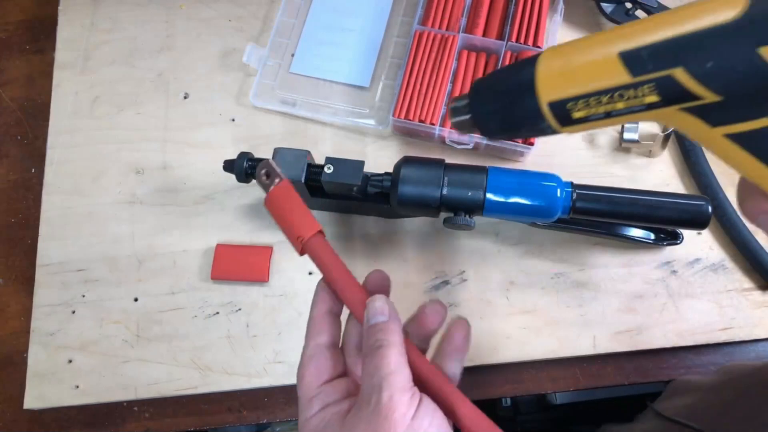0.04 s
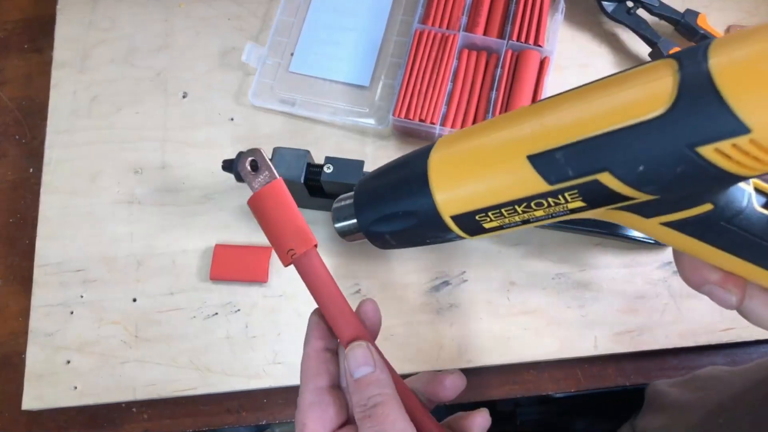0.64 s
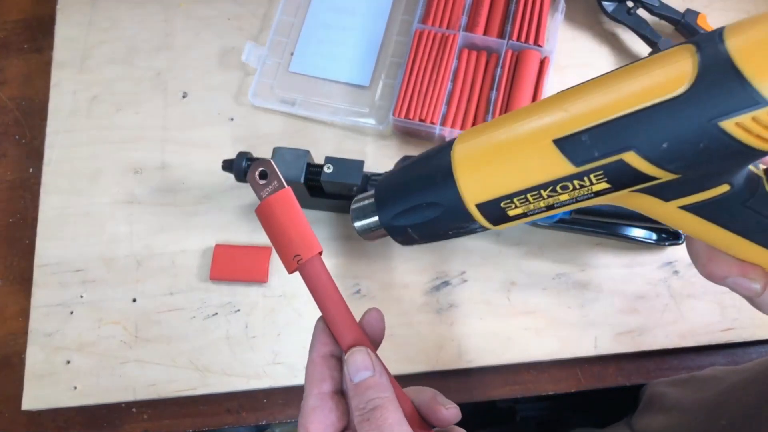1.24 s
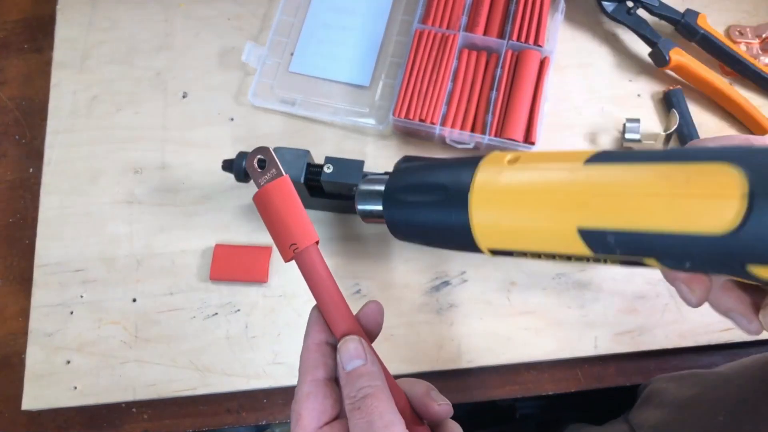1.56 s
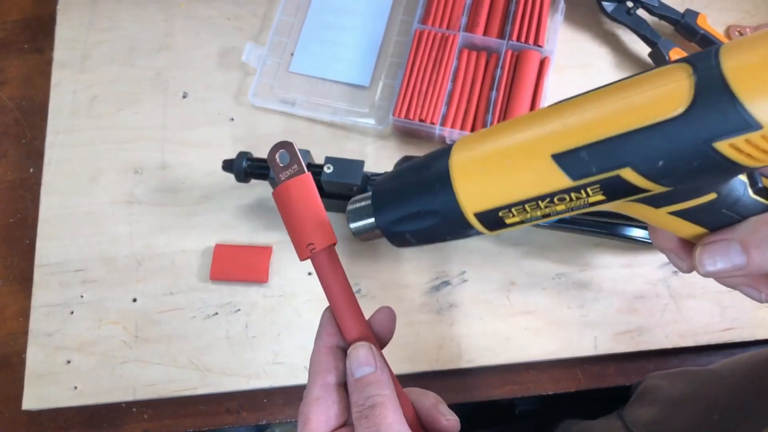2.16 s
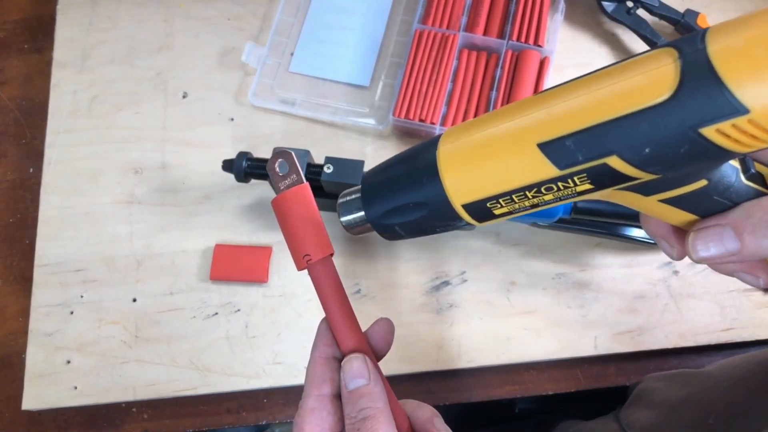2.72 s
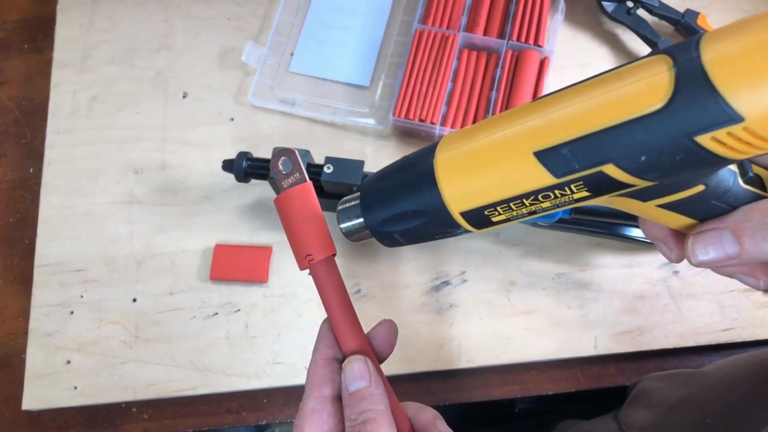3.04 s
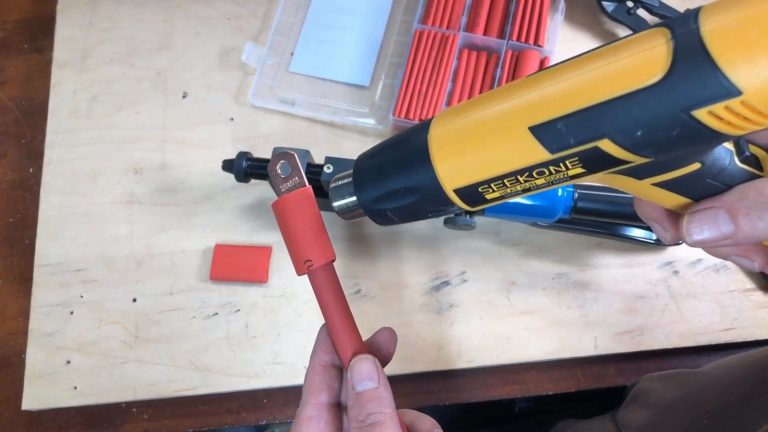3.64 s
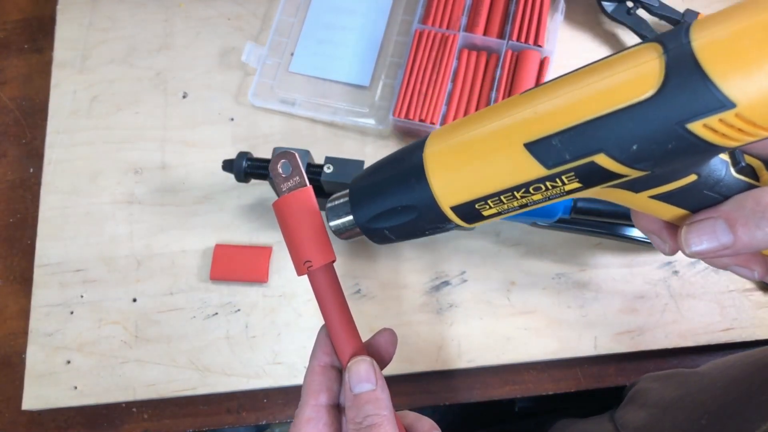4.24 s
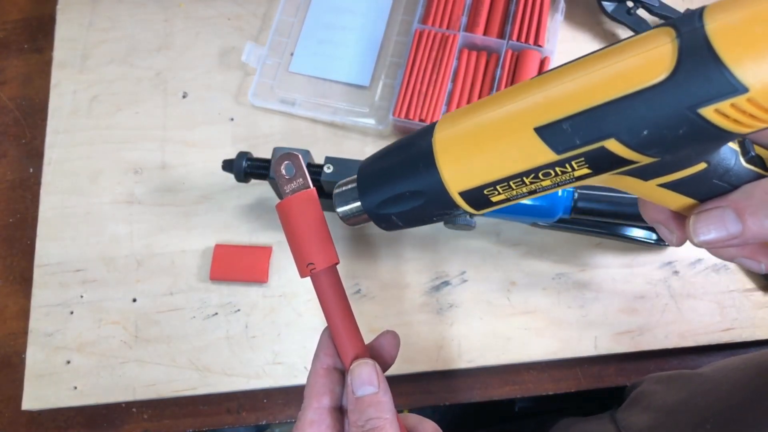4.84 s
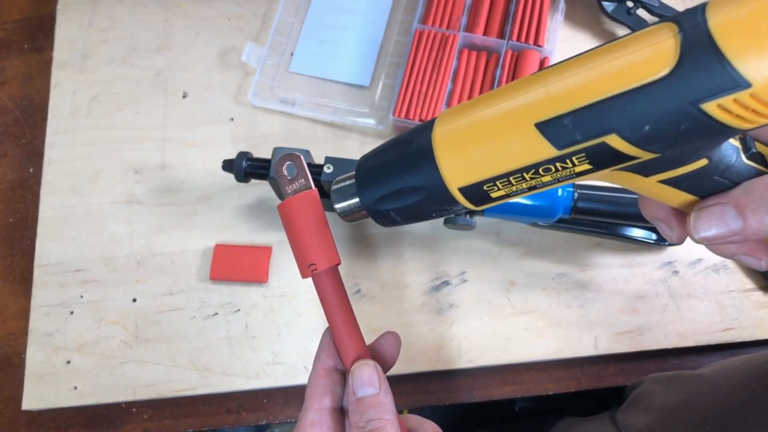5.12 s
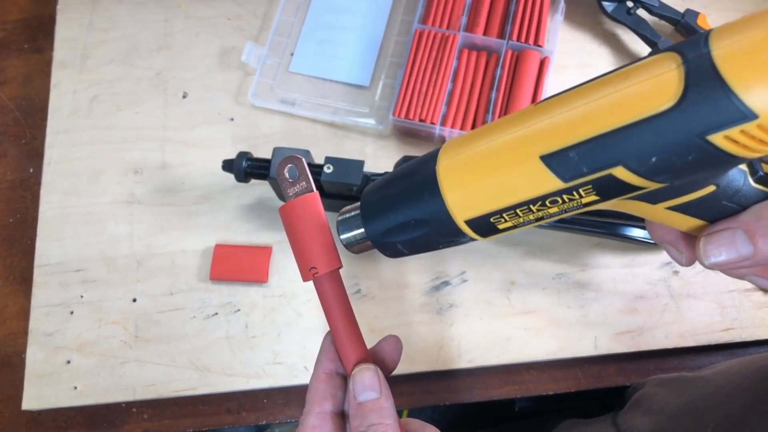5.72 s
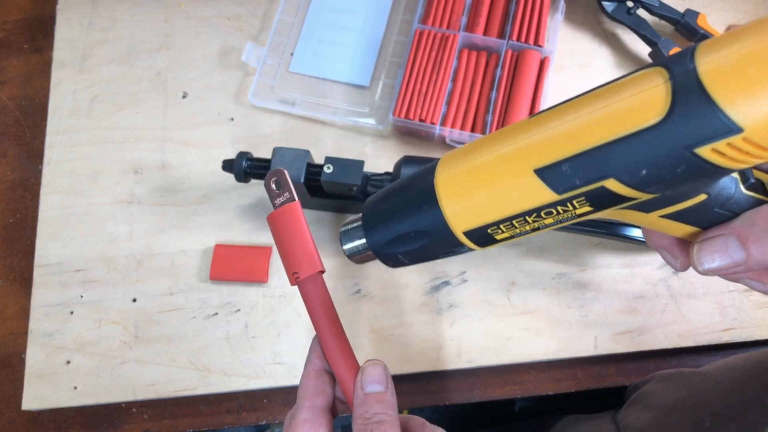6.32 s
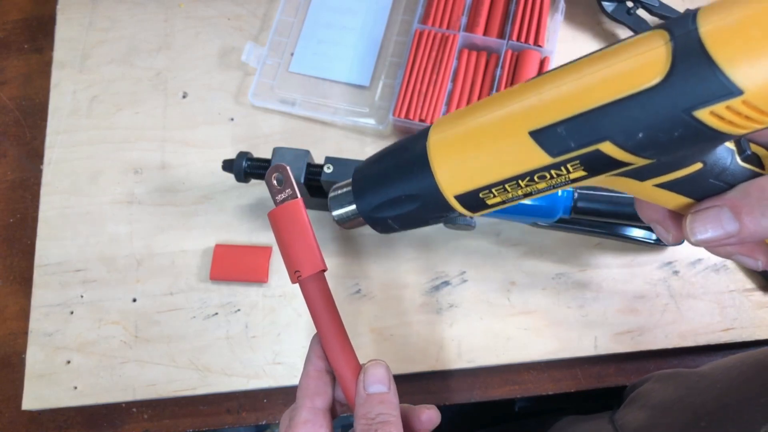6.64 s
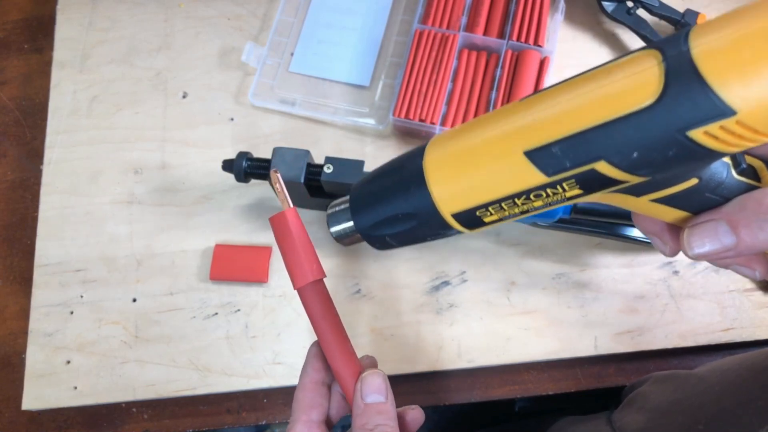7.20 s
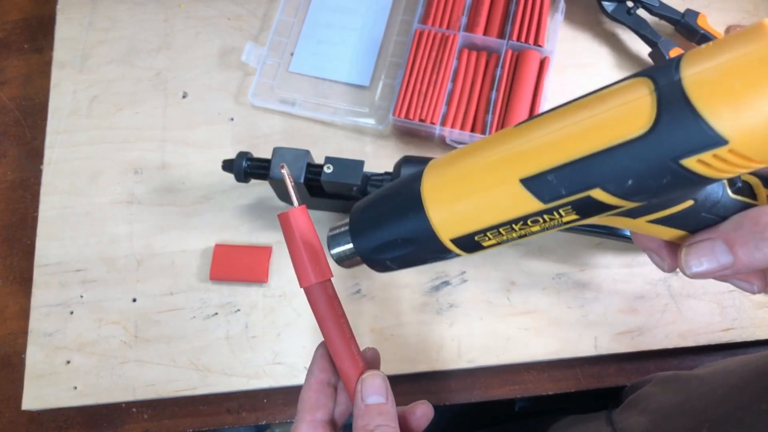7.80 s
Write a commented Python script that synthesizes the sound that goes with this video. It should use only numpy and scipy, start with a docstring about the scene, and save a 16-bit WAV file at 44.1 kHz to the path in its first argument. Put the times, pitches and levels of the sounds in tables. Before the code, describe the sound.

A heat gun's switch clicks twice, then its fan spins up to a steady high whistle over rushing air.

```python
"""A heat gun over a piece of shrink tubing, heard close up at a workbench through one microphone.
At first there is only mains hum, hiss and a thin, chopped electronic whine. A light tap, a rustle on the
grip, then the slide switch clicks twice just before 1 s. The five-bladed fan spins up to a 2 kHz whistle
with fainter shaft orders, over the rush of the air. The overtones swell as the hand rocks the gun
and, from 5.4 s, grow fainter as it is turned away from the microphone."""
import sys
import numpy as np
from scipy import signal
from scipy.fft import rfft, irfft
from scipy.io import wavfile
from scipy.ndimage import uniform_filter1d

SR = 44100
rng = np.random.default_rng(int(sys.argv[2]) if len(sys.argv) > 2 else 0)


def unload_wav(signal):
    """Save mono or channel-first audio to the path in sys.argv[1] as 16-bit WAV at rate SR, clipped to [-1, 1]."""
    wavfile.write(
        sys.argv[1],
        SR,
        np.round(np.clip(np.atleast_2d(signal).T, -1, 1) * 32767).astype(np.int16),
    )


N = 355622
TIME = np.arange(N) / SR
FREQ = np.maximum(np.arange(N // 2 + 1) * SR / N, 1)
MAINS_HZ, ZERO_CROSSING_S = 60, .787


# The blade whistle, close to the gun. Each row: time in seconds, base level in dB.
WHISTLE = [(1.3, -36.5), (1.37, -39.5), (1.41, -33), (1.43, -37), (1.56, -29.5), (1.73, -34.5),
           (3.52, -35.5), (3.88, -32.5), (4.36, -37.5), (4.74, -38.5), (5.04, -36), (6.36, -40.5),
           (6.77, -40), (6.92, -53), (7.62, -55), (8.05, -45.5)]
# Its second and third harmonics leave the gun in beams. Each gives: base level in dB with the nozzle
# down, loss in dB with it up, loss in dB once turned away, breadth of the beam as an exponent.
SECOND_BEAM = (-48, 40.5, 15, 1.5)
THIRD_BEAM = (-53, 17, 14.5, 4)

def fan(turns, spin_db, blades=5):
    """The passing blades whistle with two overtones, each tone on a skirt of turbulence."""
    running_db, = curves(WHISTLE)
    swirl_db, = curves(SWIRL)
    whistle_db = running_db + catch_db(spin_db) + .23 * wander(2.3)
    second_db = add_levels(swirl_db - 2, beam(*SECOND_BEAM)) + 3.5 * spin_db  # swirl feeds this one
    third_db = beam(*THIRD_BEAM) + 3.2 * spin_db
    up_to_speed = ramp(1.12, .12)
    passes = blades * turns
    whistle = tone(passes, whistle_db - .8 + .5 * wander(39))
    whistle += eddies(.984 * passes, 62, whistle_db - 8)  # these eddies lag behind the blades
    second = tone(2 * passes, second_db - 5 + 2.4 * wander(4.7)) * up_to_speed
    second += eddies(2 * passes, 110, second_db - 8.5)
    third = tone(3 * passes, third_db + 1.3 * wander(5.3)) * up_to_speed
    third += eddies(3 * passes, 190, third_db - 10)
    ripple = 2 * MAINS_HZ * TIME  # rectified mains ripples the torque and adds side tones
    side_tones = tone(passes + ripple, whistle_db - 27) + tone(3 * passes + ripple, third_db - 16)
    return (whistle + second + third + side_tones) * ramp(.96, .055)


def eddies(cycles, width_hz, db):
    """Blades cutting through eddies: a tone smeared into a narrow hump."""
    phase = 2 * np.pi * cycles
    return (wander(width_hz) * np.sin(phase) + wander(width_hz) * np.cos(phase)) * undb(db)


def catch_db(spin_db, threshold_db=-.38, db_per_db=4.6):
    """A whistle only catches near full speed: below a threshold of flow its level falls steeply."""
    return db_per_db * np.minimum(spin_db - threshold_db, 0)


def shaft_hz(start_s=.855, spin_up_s=.154, running_hz=401.8, creep_hz_per_s=.44):
    """Turns per second: the motor closes in on its running speed, then creeps up slowly."""
    age = np.maximum(TIME - start_s, 0)
    return (running_hz + creep_hz_per_s * age) * (1 - np.exp(-age / spin_up_s))


# The hand rocks the gun over the bench about once a second.
# Each row: time in seconds, tilt from about 0 (nozzle up) to about 1 (nozzle down).
ROCKING = [(1.3, .25), (1.62, 0.46), (1.78, 0.24), (1.95, 1.1), (2.48, 0.86), (2.98, .35), (3.22, 0.93),
           (3.65, .3), (3.92, 0.53), (4.15, 0.12), (4.27, 0.0091), (4.44, 0.78), (4.66, 0.7), (4.88, 0.33),
           (5.17, 0.34), (5.42, 0.88), (5.62, 0.96), (5.82, .12), (5.95, 0.2), (6.19, 0.98), (6.48, 0.15),
           (6.84, 0.88), (7.05, 0.16), (7.36, 1.0), (7.58, 0.27), (7.78, 0.97), (8.05, 0.92)]

def beam(db, tilt_loss_db, turn_loss_db, breadth, turn_s=5.41, turn_takes_s=1):
    """Level of a beamed sound at the microphone as the gun is rocked and turned away."""
    tilt, = curves(ROCKING)
    off_axis = np.maximum(1 - tilt, 0)
    return db - tilt_loss_db * off_axis ** breadth - turn_loss_db * ramp(turn_s, turn_takes_s)


# Strong swirl at the intake in the first seconds. Each row: time in seconds, base level in dB.
SWIRL = [(1.17, -65), (1.28, -46), (1.42, -47.5), (1.72, -41.5), (2.1, -46.5), (2.85, -48.5), (3.3, -51),
         (3.55, -55.5), (3.72, -70)]
# The draught drawn in at the back of the gun, with the same four values as SECOND_BEAM.
INTAKE_BEAM = (-55, 20.5, 8.5, 1.4)

def intake_db(spin_db):
    """Level of the air at the intake: the early swirl plus the beamed draught."""
    swirl_db, = curves(SWIRL)
    return add_levels(swirl_db, beam(*INTAKE_BEAM) + spin_db)


# The motor's steady tones. Each row: multiple of the shaft speed, level in dB at full speed.
MOTOR_ORDERS = [(2, -71.5), (4, -67), (6, -65), (7, -77.5), (9, -74.5), (11, -78), (13, -78), (14, -78.5),
                (27, -102), (33, -92.5), (34, -92.5), (35, -86.5), (36, -92.5), (37, -87)]
# Tones that swell with the intake air. Each row: multiple of the shaft speed, dB relative to that air.
INTAKE_ORDERS = [(4, -19), (6, -13), (7, -3), (9, -24), (11, -30), (13, -31), (14, -22)]
# The high whine beamed from the vents, with the same four values as SECOND_BEAM.
VENT_BEAM = (-55, 28, -0.5, 0.6)

def motor(turns, spin_db, vent_order=16):
    """Shaft orders from imbalance, uneven blades and the commutator; high ones sing near full speed."""
    imbalance = tone(turns, -70 + spin_db / 4 + 1.5 * wander(11)) * ramp(.96, .1)
    speed_db = 2 * spin_db
    steady = sum(tone(k * turns, db + speed_db + 2.3 * wander(8)) for k, db in MOTOR_ORDERS)
    air_db = intake_db(spin_db) + speed_db
    swelling = sum(tone(k * turns, db + air_db + 1.9 * wander(4.2)) for k, db in INTAKE_ORDERS)
    vent_db = beam(*VENT_BEAM) + speed_db
    whine = tone(vent_order * turns, vent_db + 1.4 * wander(45))
    whine += tone((vent_order + 1) * turns, vent_db - 18.5 + 2.2 * wander(8))
    return imbalance + steady + swelling + whine


def whirr(turns, at_s=1.31, width_s=.063, top_lag_s=.093):
    """As the motor pulls up to speed, middle and then top shaft orders rasp, in a brief bright hiss."""
    middle = sum(tone(k * turns, -62 + 3 * wander(20)) for k in (6, 7, 9, 10, 11))
    top = sum(tone(k * turns, -81 + 5 * wander(30)) for k in (25, 30, 33, 37, 40))
    hiss = noise(resonances([(4650, 2700, -94)])) * swell(1.6, .24) * ramp(1.1, .13)
    return middle * swell(at_s, width_s) + top * swell(at_s + top_lag_s, width_s / 2) + hiss


# Thin high tones at the microphone. Each row: time in seconds, base level in dB.
TREBLE_LEVEL = [(1.25, -88), (1.49, -74), (1.57, -56), (1.74, -63), (1.78, -77), (2.1, -89), (2.75, -80.5),
                (2.8, -69), (3.24, -84), (3.6, -79.5), (3.92, -67), (4.22, -83), (8.05, -79)]
# Their pitches. Each row: frequency as a multiple of the shaft speed, dB relative to that level.
TREBLE_TONES = [(24, -18.5), (25, -3), (26, -14.5), (30, -18), (34, -17.5), (37, -15.5), (39, -16.5)]

def treble_flare(turns, spin_db, peak_s=1.47, peak_db=-110.5, rise_db_per_s=49, fall_db_per_s=30):
    """Thin high tones and a pulsing sizzle, flaring briefly when the gun is loudest,
    perhaps overloading the microphone."""
    age = TIME - peak_s
    burst_db = peak_db + np.minimum(rise_db_per_s * age, -fall_db_per_s * age)
    trace_db = intake_db(spin_db) - 72.5  # the sizzle dies back to a trace that follows the intake air
    sizzle_db = add_levels(burst_db + 2.5 * wander(12), trace_db)
    tones_db = curves(TREBLE_LEVEL)[0] + catch_db(spin_db)
    tones = sum(tone(k * turns, db + tones_db + 2 * wander(14)) for k, db in TREBLE_TONES)
    colour = resonances([(8150, 1800, 1), (10000, 800, 0), (11900, 2000, .5), (15000, 2600, 1.5)])
    sizzle = noise(colour) * (1 + .7 * np.cos(2 * np.pi * turns))
    return tones + sizzle * undb(sizzle_db + spin_db + 1.8 * wander(60))


# The air jet leaving the nozzle. Each row: frequency in Hz, level in dB per Hz at full speed.
JET = [(100, -112), (280, -108), (900, -105), (1250, -87), (1700, -85.5), (2000, -84), (2300, -85),
       (2700, -93), (3200, -95), (3500, -90.5), (4400, -101), (5100, -102), (5700, -99.5), (6400, -104),
       (7100, -117), (15000, -120)]
# Resonances of barrel and bench. Each row: centre in Hz, width in Hz, dB per Hz relative to the rush.
BARREL_MODES = [(346, 108, -29), (493, 157, -28), (730, 122, -27.5), (862, 66, -26.5), (1069, 108, -24.5),
                (2970, 43, -27.5), (4880, 340, -37)]
# The hollow roar of the nozzle. Each row: time in seconds, base level in dB.
ROAR = [(1.28, -59), (1.41, -45.5), (1.5, -56), (1.58, -43.5), (1.9, -44.5), (2.08, -55.5), (2.19, -46.5),
        (2.65, -58.5), (3.05, -56.5), (8.05, -57)]
# Resonances of the nozzle. Each row: centre in Hz, width in Hz, dB per Hz relative to the roar.
NOZZLE_MODES = [(1329.4, 92, -21), (1460, 146, -22)]

def air_jet(spin_db, rush_db=-62.5):
    """The jet grows with fan speed, rings barrel and bench as it strikes the work, and roars."""
    roar_db, = curves(ROAR)
    jet = noise(slope(JET)) * undb(spin_db + 1.4 * wander(14))
    puffing_db = 1.2 * wander(11)
    rush = noise(resonances(BARREL_MODES)) * undb(rush_db + 1.8 * spin_db + puffing_db)
    roar = noise(resonances(NOZZLE_MODES)) * undb(roar_db - 1.5 + .5 * spin_db + 1.7 * wander(12))
    return jet + rush + roar


# Resonances of the fan housing. Each row: centre in Hz, width in Hz, dB per Hz relative to the intake.
HOUSING_MODES = [(2033, 148, -21.5), (2284, 73, -26), (2704, 450, -28.5), (2947, 220, -33),
                 (3450, 220, -36.5), (3840, 280, -35.5), (4200, 290, -35), (5680, 450, -38.5),
                 (6460, 450, -50.5)]

def housing(spin_db):
    """Air swirling in at the intake rings the fan housing."""
    level_db = intake_db(spin_db) + spin_db / 4 + 1.7 * wander(45)
    ring = noise(resonances(HOUSING_MODES)) * undb(level_db + 2 * wander(9))
    hollow = 1 - resonances([(5000, 550, -2)])  # a dip between the upper resonances
    return irfft(rfft(ring) * hollow, N)


# Puffs of air over the bench. Each row: peak time in seconds, width in seconds, level in dB per Hz.
PUFFS = [(1.566, 0.021, -74.5), (1.695, 0.0066, -83), (2.473, .03, -82), (2.952, 0.012, -81.5),
         (3.112, 0.014, -86)]

def puffs():
    """Short low puffs of air as the gun swings round."""
    envelope = sum(undb(db) * swell(s, width_s) for s, width_s, db in PUFFS)
    return noise(resonances([(428, 130, 0), (787, 130, .0051)])) * envelope


# A light tap, then the switch passes two detents and snaps home, the last two knocks heard as one.
# Each row: start in seconds, level in dB, time in seconds to ring down by 60 dB.
CLICKS = [(0.244, -59.5, 0.046), (0.834, -34, 0.05), (0.9454, -37.5, 0.072), (0.949, -28.5, 0.035)]
# Resonances of the gun's plastic shell. Each row: centre in Hz, width in Hz, relative level in dB.
SHELL_MODES = [(536, 250, -7), (800, 290, -7.5), (1035, 160, -2.5), (1300, 140, 0), (1780, 690, 2.5),
               (2150, 120, 5), (2580, 150, -1), (2890, 430, -2.5), (3400, 1400, -8.5), (4160, 620, -9),
               (4900, 440, -5.5), (6300, 1100, -18.5), (11000, 9200, -28)]

def clicks(contact_s=.00032, tail_db=-25, tail_t60=.2, low_hz=430):
    """Each knock rattles the plastic shell and leaves a faint tail in the room."""
    ring = noise(resonances(SHELL_MODES))
    envelope = 0
    for s, db, t60 in CLICKS:
        age = np.maximum(TIME - s, 0)
        contact = 1 - np.exp(-age / contact_s)
        decay = undb(-60 * age / t60) + undb(tail_db - 60 * age / tail_t60)
        envelope += contact * undb(db) * decay
    low_cut = signal.butter(4, low_hz, "high", fs=SR, output="sos")  # a small shell radiates no bass
    return signal.sosfilt(low_cut, ring / ring.std() * envelope)


def slider(chirp_s=.914, chirp_hz=1820, chirp_db=-67):
    """The hand rustles on the grip, the switch scrapes, and a faint chirp rises between its clicks."""
    rustle = noise(resonances([(2600, 1700, -114)])) * swell(.67, .08)
    scrape = noise(resonances([(2700, 5100, -106), (4500, 1500, -112)])) * swell(.812, .027)
    glide = np.clip((TIME - chirp_s) / .11, -.2, .2)
    hz = chirp_hz * (1 + glide + .02 * wander(200))
    chirp = tone(np.cumsum(hz) / SR, chirp_db) * swell(chirp_s, .009)
    return rustle + scrape + chirp


def electrics(whine_hz=7983, whine_db=-66.5, gap_share=.38, buzz_db=-115):
    """A thin whine drops out, and a faint buzz pulses, at every zero crossing of the mains."""
    half_cycles = 2 * MAINS_HZ * (TIME - ZERO_CROSSING_S)
    on = abs(half_cycles - np.round(half_cycles)) > gap_share / 2
    whine = tone(whine_hz * TIME, whine_db) * uniform_filter1d(on * 1., size=10)
    # smeared spikes of alternating sign carry the hum's odd harmonics into the treble
    spikes = np.diff(np.floor(half_cycles) % 2, prepend=0)
    smear = rng.standard_normal(N) * np.exp(-TIME / .0022)
    buzz = signal.fftconvolve(spikes, smear)[:N]
    colour = resonances([(2470, 1700, buzz_db), (8000, 2100, buzz_db - 5.5)])
    return whine + irfft(rfft(buzz / buzz.std()) * colour, N) * np.sqrt(SR / 2)


# Mains hum at the bench. Each row: frequency in Hz, level in dB.
HUM = [(60, -66), (180, -72), (300, -80), (420, -84), (540, -88.5), (660, -87), (780, -87), (900, -89),
       (1020, -93), (1140, -94), (1260, -90)]

def mains_hum():
    """Odd harmonics of the mains, lined up into a sharp step at each zero crossing."""
    phase_per_hz = 2 * np.pi * (TIME - ZERO_CROSSING_S)
    return sum(-np.sqrt(2) * undb(db) * np.sin(hz * phase_per_hz) for hz, db in HUM)


# The noise floor at the microphone. Each row: frequency in Hz, level in dB per Hz.
HISS = [(8, -77), (25, -102.5), (45, -95), (80, -95), (150, -103), (400, -113), (1200, -118), (2500, -117),
        (5000, -121), (10000, -122), (14000, -123), (15600, -115)]

def background_hiss():
    """A steady hiss, strongest in the bass, lies under everything."""
    return noise(slope(HISS))


def undb(db):
    """Decibels to gain."""
    return 10 ** (np.asarray(db) / 20)


def add_levels(a_db, b_db):
    """The level of two unrelated sounds together."""
    return 10 * np.log10(undb(a_db) ** 2 + undb(b_db) ** 2)


def curves(table):
    """The value columns of a table of (s, value, ..) rows, sample by sample."""
    s, *columns = np.transpose(table)
    return [np.interp(TIME, s, column) for column in columns]


def ramp(start_s, length_s):
    """A straight rise from 0 to 1."""
    return np.clip((TIME - start_s) / length_s, 0, 1)


def swell(peak_s, width_s):
    """A bell-shaped envelope."""
    return np.exp(-((TIME - peak_s) / width_s) ** 2 / 2)


def slope(points):
    """Gain per frequency through (Hz, dB) points."""
    hz, db = np.transpose(points)
    return undb(np.interp(np.log(FREQ), np.log(hz), db))


def resonances(modes):
    """Gain per frequency of steep-sided (Hz, width in Hz, dB) resonances."""
    gains = (undb(db) / (1 + ((FREQ ** 2 - hz ** 2) / (FREQ * width)) ** 2) for hz, width, db in modes)
    return np.sqrt(sum(gain ** 2 for gain in gains))


def noise(gain):
    """Noise with the given density per root Hz."""
    return irfft(rfft(rng.standard_normal(N)) * gain, N) * np.sqrt(SR / 2)


def wander(rate_hz):
    """Random motion up to about rate_hz, spread 1."""
    motion = noise(1 / (1 + (FREQ / rate_hz) ** 2))
    return motion / motion.std()


def tone(cycles, db):
    """A sine that follows a count of cycles, at an rms level."""
    return np.sqrt(2) * undb(db) * np.sin(2 * np.pi * (cycles + rng.random()))


def scene():
    """One shaft drives fan, motor and air; switch and background join them at the microphone."""
    hz = shaft_hz()
    speed = hz / hz.max()
    shudder = .00035 + .024 * (1 - speed)  # the shaft shudders while it gathers speed
    turns = np.cumsum(hz * (1 + shudder * wander(11.6))) / SR
    spin_db = 55 * np.log10(np.maximum(speed, 1e-3))  # flow noise rises steeply with speed
    machine = fan(turns, spin_db) + motor(turns, spin_db) + whirr(turns)
    treble = treble_flare(turns, spin_db)
    air = air_jet(spin_db) + housing(spin_db) + puffs()
    switch = slider() + clicks()
    background = electrics() + mains_hum() + background_hiss()
    return (machine + treble + air + switch + background)[None]


def record(dry, top_hz=15750):
    """The mono recorder cuts the top steeply."""
    return signal.sosfilt(signal.ellip(12, .2, 80, top_hz, fs=SR, output="sos"), dry)


dry = scene()
out = record(dry)
unload_wav(out)
```